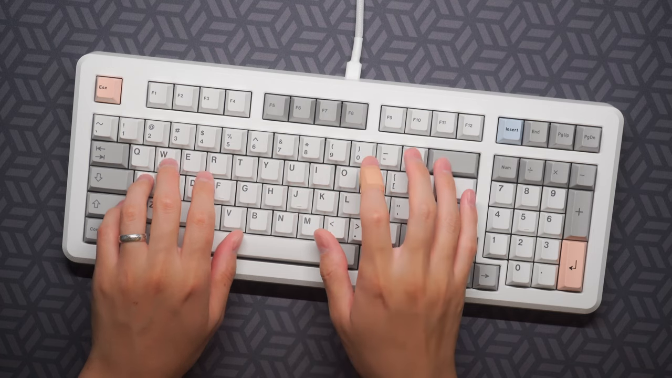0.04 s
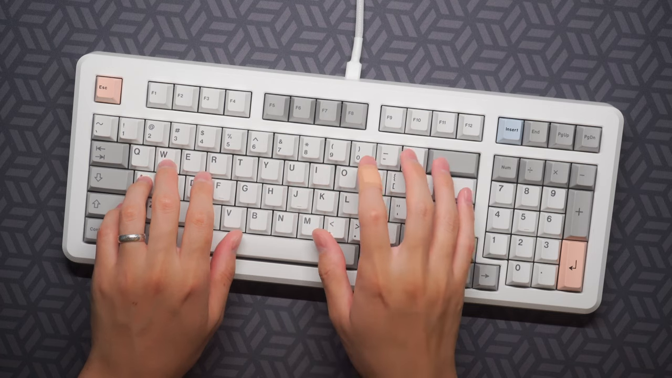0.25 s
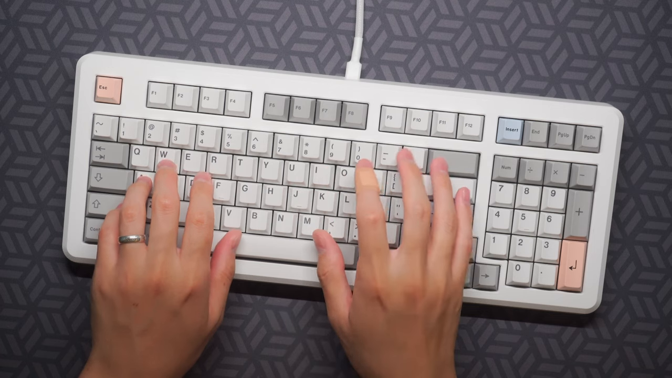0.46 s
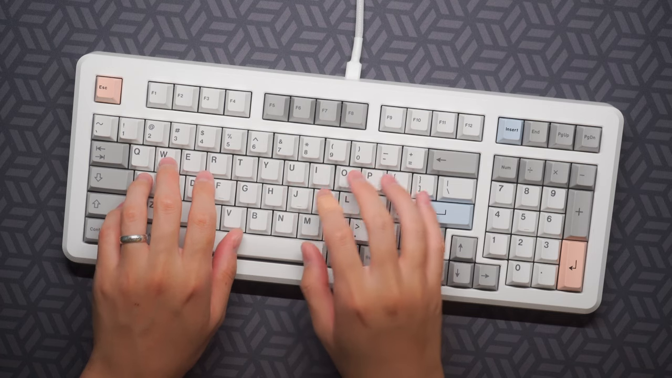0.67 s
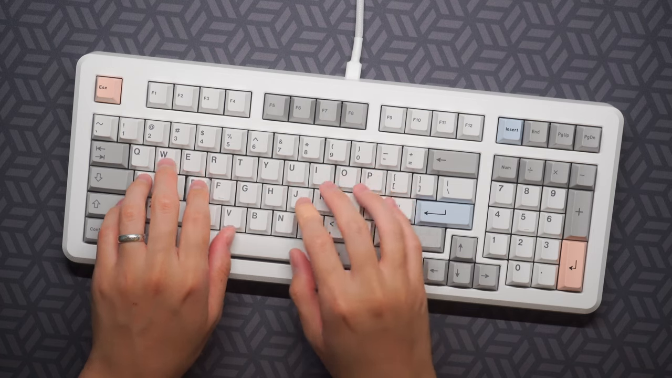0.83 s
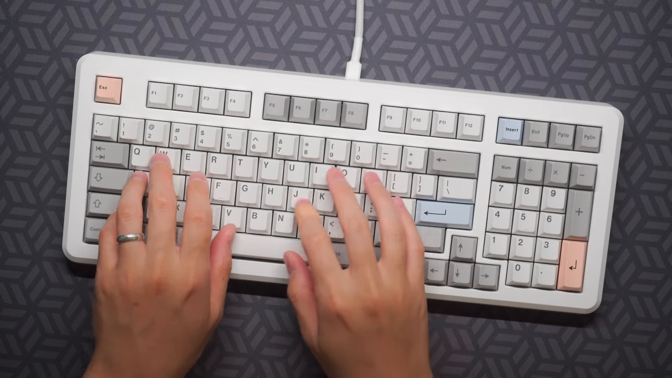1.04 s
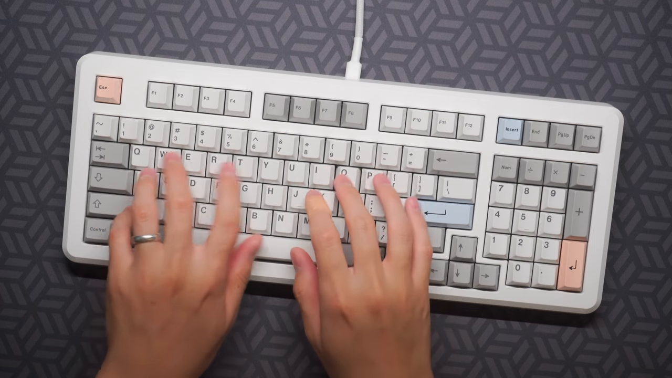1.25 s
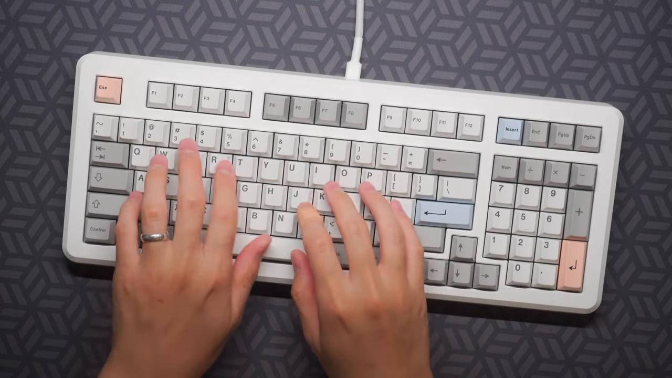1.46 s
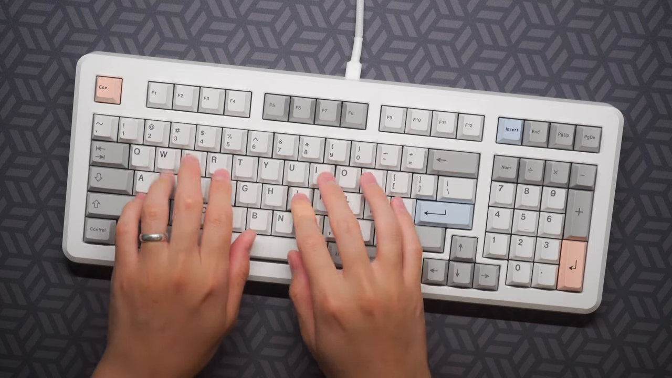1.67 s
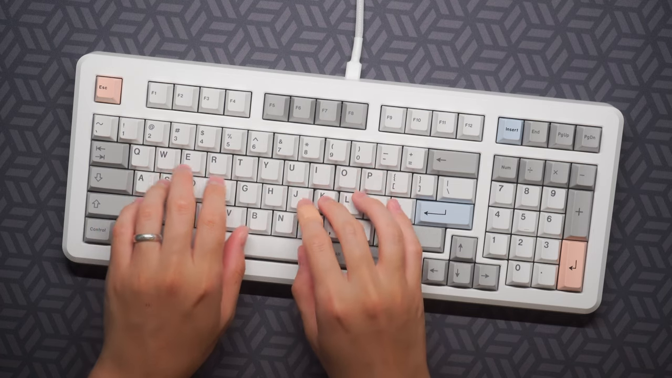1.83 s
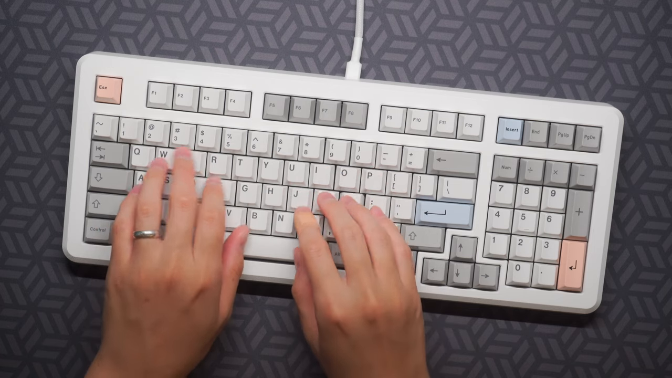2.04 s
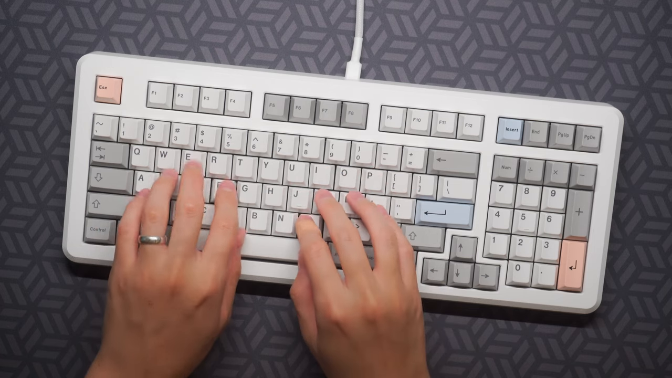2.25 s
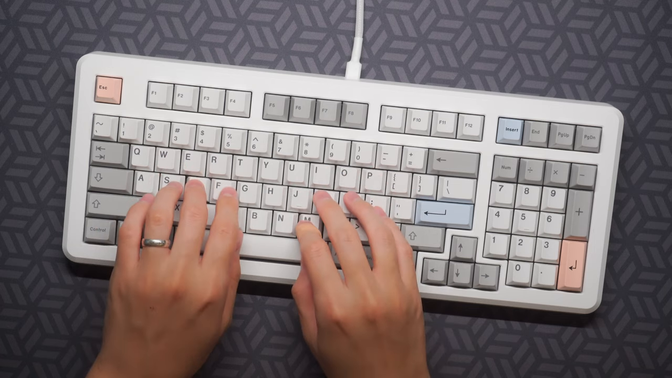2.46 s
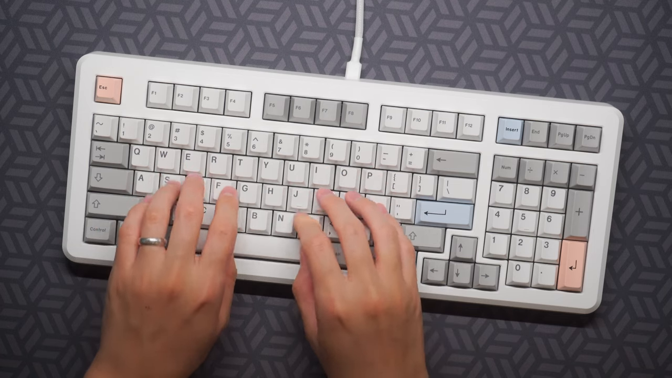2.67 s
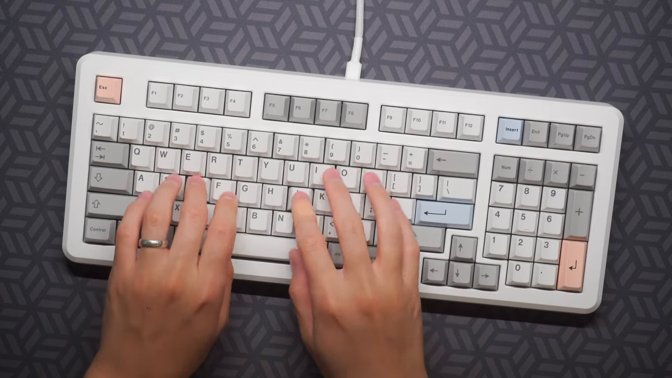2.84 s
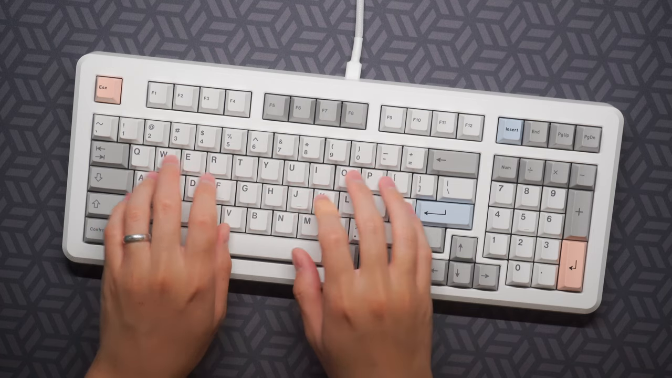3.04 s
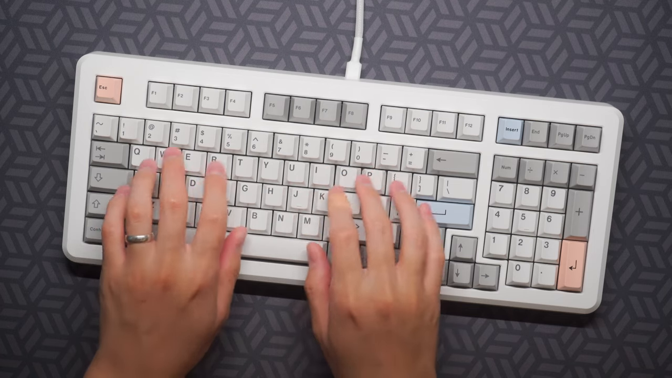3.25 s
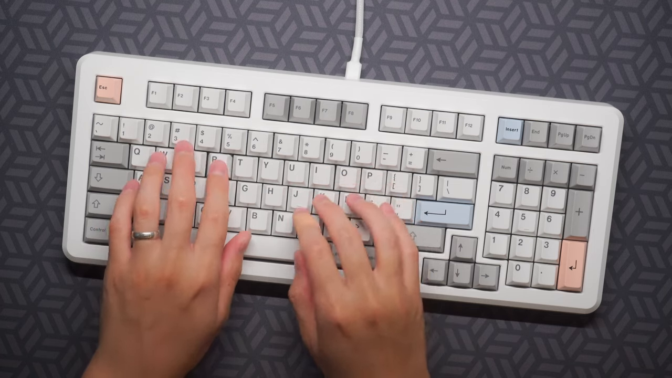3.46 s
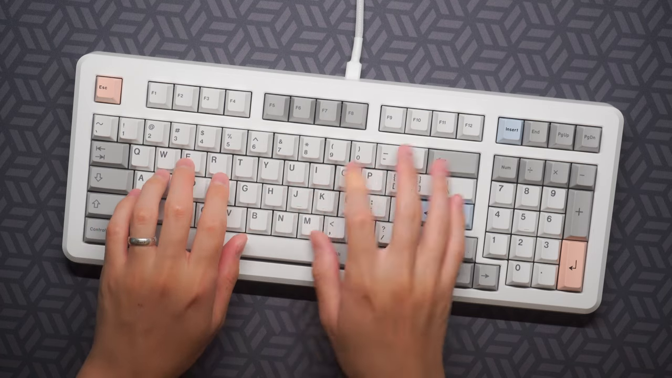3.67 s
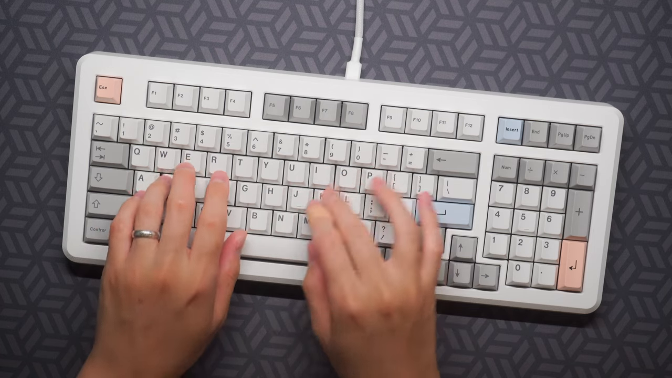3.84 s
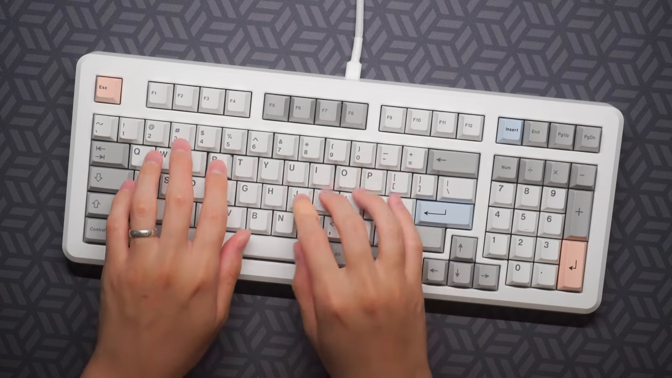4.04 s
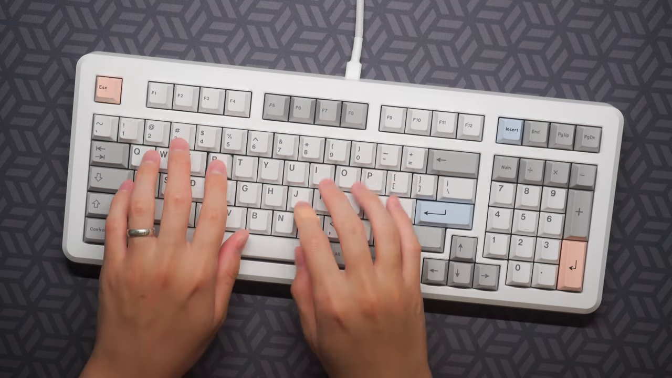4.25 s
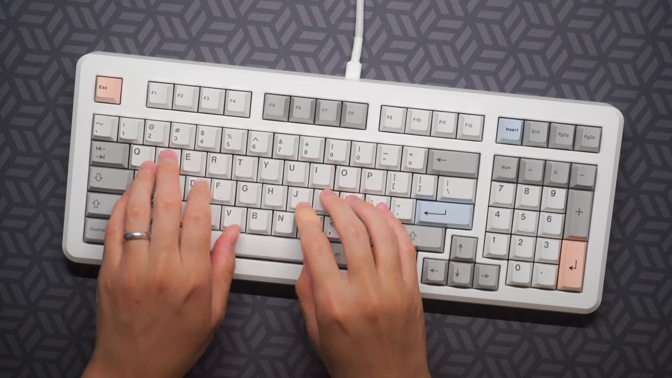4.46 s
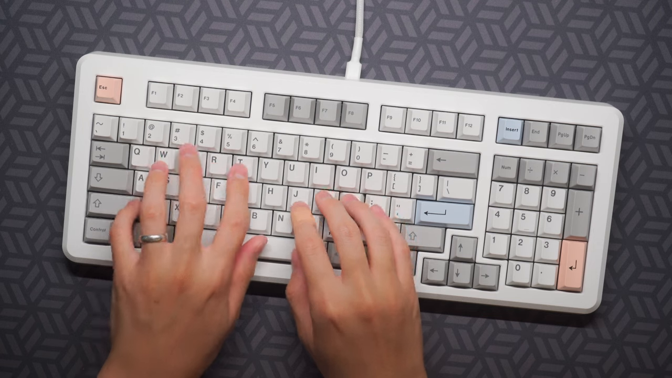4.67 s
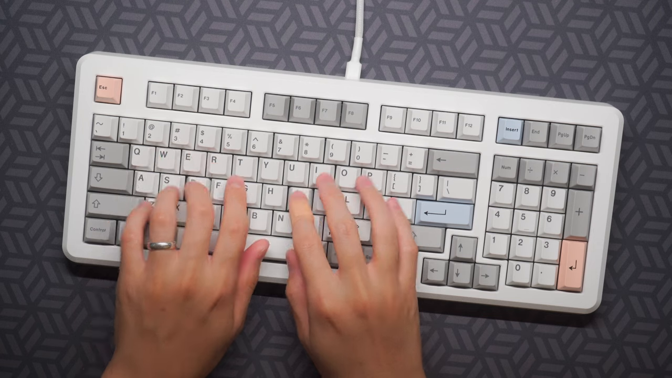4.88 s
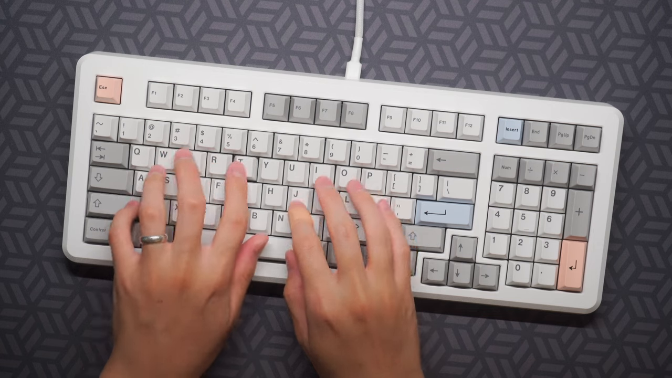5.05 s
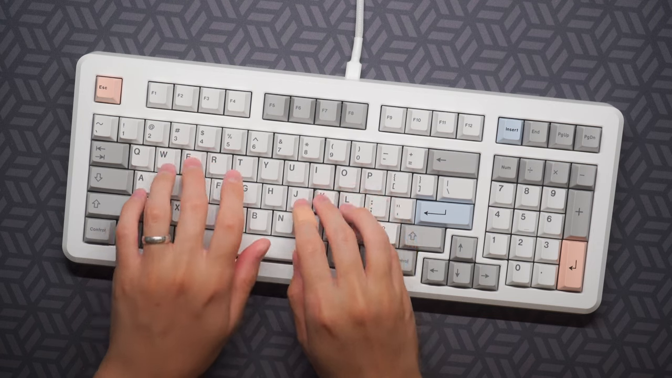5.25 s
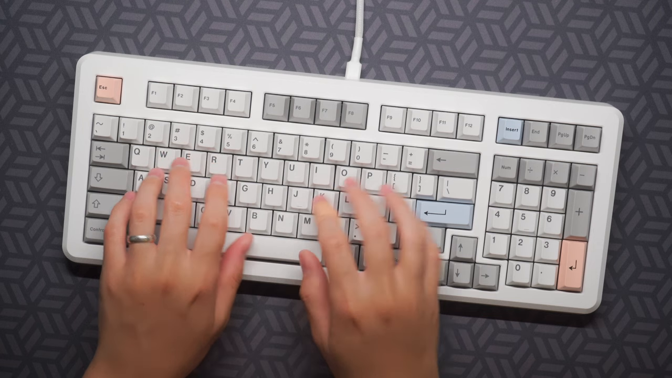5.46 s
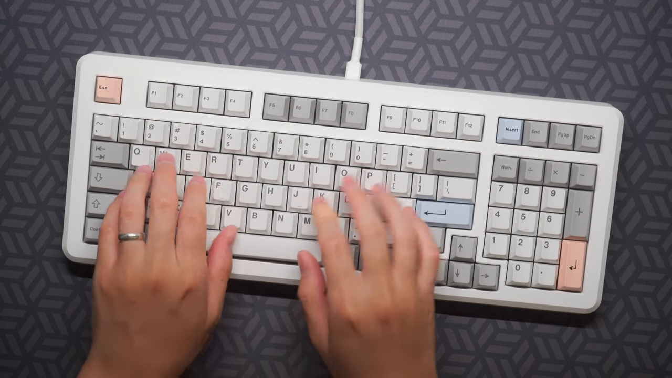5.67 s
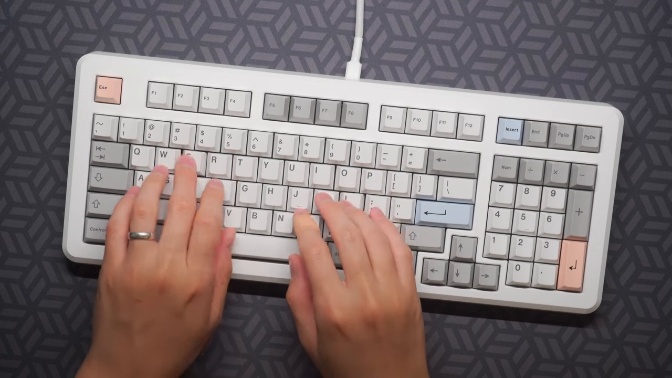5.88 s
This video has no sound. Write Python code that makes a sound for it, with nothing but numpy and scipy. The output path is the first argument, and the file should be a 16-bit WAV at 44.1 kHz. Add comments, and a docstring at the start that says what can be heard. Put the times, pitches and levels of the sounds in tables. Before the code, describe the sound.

Close-up of rapid keyboard typing: low, rounded case thumps, some hard and some light, mixed with dry stem clicks, spring-back ticks, faint scuffs and skin brushes. It starts sparsely, becomes an almost continuous clatter, pauses briefly midway, then resumes with stronger strokes. The room is quiet, with short dull reflections, a soft desk tremor, low building rumble and thin steady hiss.

```python
"""Fast two-handed typing on a heavy, damped mechanical keyboard: dull thumps under a spray of small plastic ticks.
Keys bottoming out thump case and desk through banks of decaying modes; fingertips, stems and returning caps
tick as noise flurries ringing the plastic; skin brushes, stem scuffs and cap wobbles fill the gaps.
The walls add a few dull echoes and a tail, over building rumble, steady hiss and a trembling desk."""
import sys
import numpy as np
from scipy import signal
from scipy.fft import rfft, irfft, next_fast_len
from scipy.io import wavfile

SR = 44100
rng = np.random.default_rng(int(sys.argv[2]) if len(sys.argv) > 2 else 0)


def unload_wav(signal):
    """Save mono or channel-first audio to the path in sys.argv[1] as 16-bit WAV at rate SR, clipped to [-1, 1]."""
    wavfile.write(
        sys.argv[1],
        SR,
        np.round(np.clip(np.atleast_2d(signal).T, -1, 1) * 32767).astype(np.int16),
    )


N = 260617  # length in samples

# Building rumble. Each row: frequency in Hz, relative density in dB per Hz.
RUMBLE_SPECTRUM = [(12, -58), (20, 2), (38, -11), (79, 5.5), (94, -16), (108, -15.5), (167, -8.5),
                   (260, -32), (340, -93), (570, -120)]
# Fan and microphone hiss. Each row: frequency in Hz, relative density in dB per Hz.
HISS_SPECTRUM = [(150, 5), (260, -3.5), (707, -11.5), (825, -7.5), (1760, -20), (4550, -29.5), (10600, -27),
                 (14700, -22), (16000, -52.5)]
# Resting wrists shaking the desk. Each row: time in seconds, RMS level in dB.
DESK_SWAY = [(0.0, -59), (0.44, -48.5), (0.79, -70), (0.84, -53.5), (5.14, -50.5), (5.54, -54.5),
             (5.9, -52)]
# Fingertips gliding over caps. Each row: start in seconds, level in dB before the part trims,
# nominal length in ms.
BRUSHES = [(0.061, -63.5, 20), (.49, -64, 8), (3.547, -60.5, 9.7), (3.704, -59.5, 23)]
# Fingertips meeting caps and caps springing back. Each row: start in seconds, stem click in dB before
# the common trim, then against that click in dB: cap hollow, switch housing.
CAP_CONTACTS = [(0.192, -48.5, -6, -12), (0.2035, -48, -3, -16), (0.3502, -51, -4, -5),
                (0.4171, -44, 0.5, -4.5), (0.842, -44.5, 0.5, 0.5), (0.9391, -51.5, 5, 16.5),
                (1.0018, -40.5, -7, 0), (1.0475, -51, -6, -3), (1.1106, -53.5, 3, 9.5),
                (1.1785, -42, -20, -18), (1.1908, -37.5, 0.5, -4.5), (1.1993, -39, -7, -10),
                (1.2636, -41, -17, -4.5), (1.3024, -47, -8, -13), (1.3436, -35, -1.5, -2),
                (1.3934, -37.5, -15, -22), (1.5308, -45, 6, -4), (1.542, -54.5, 4, 10),
                (1.6275, -47, -3.5, 6.5), (1.6398, -56, 2, 7), (1.7499, -47, 0, 5), (1.7716, -42, 10, 5),
                (1.8666, -30.5, -25, -11), (1.9832, -40.5, 5, 6), (2.043, -37, -16, -5),
                (2.0497, -38.5, 2, -1), (2.0854, -53.5, 9.5, 6), (2.1172, -42.5, 6, 2.5),
                (2.2586, -54, 2, -4), (2.3713, -44, 8.5, 9.5), (2.4556, -48.5, 4, 6), (2.5753, -62, 8, 5),
                (2.591, -45, 0, -3), (2.7872, -51.5, -2, -2), (2.8304, -37.5, -23, -1.5),
                (2.856, -46.5, -11, 6.5), (2.9577, -35.5, -3.5, -8), (3.011, -59, -7, 20),
                (3.0698, -48.5, 1.5, -1), (3.1083, -51.5, 4, 3), (3.1736, -53, 6.5, 0), (3.2544, -56, 4, 0),
                (3.428, -46, 5, 3.5), (3.7357, -49.5, 0.5, -7), (3.7973, -29.5, 0, 3.5),
                (3.822, -48, 9, -1), (3.8904, -31.5, -3, -6), (3.9493, -29.5, -21, -2),
                (4.0428, -36.5, 0.5, -0.5), (4.0745, -41.5, -0.5, 8.5), (4.1193, -37.5, -29, -10),
                (4.13, -39.5, -13, -2), (4.1386, -45.5, 3, 9), (4.234, -48, 4.5, 0), (4.354, -44, 3, 1),
                (4.4216, -29.5, -33, -1), (4.5239, -44, 8.5, 2.5), (4.5324, -44.5, 6, 0.5),
                (4.58, -43, 1, 1), (4.63, -43.5, -1, 1.5), (4.6677, -47, -10, -20), (4.7171, -39, 1.5, 3),
                (4.76, -38, -33, -18), (4.8218, -41, 2, -2), (4.8326, -44, -1, 2.5), (4.886, -50.5, 4, 6),
                (4.9718, -53.5, 2.5, 2.5), (4.9891, -45, -5, -9), (5.0353, -52, -8, -7),
                (5.0607, -39.5, -1.5, -3.5), (5.1215, -44, -23, -26), (5.136, -34, -10, -7.5),
                (5.2135, -31.5, -3, 0), (5.2962, -40, 1, -1.5), (5.3184, -54, 3, -1),
                (5.5465, -38, -12, -2), (5.6548, -42, -15, -22), (5.725, -50, 7, 5.5),
                (5.8081, -34.5, 3.5, -7), (5.8606, -56.5, 5, -1), (5.899, -42, 4.5, -2.5)]
# Keys landing. Each row: time the stem meets its housing in seconds, peak thump of the lower case in dB,
# then against that thump in dB: upper case, plate, cap hollow and stem click (the last two before trims).
KEY_LANDINGS = [(0.253, -37.5, -6, -9, -6, -10), (0.361, -39, -1, -3, -20, -16),
                (0.414, -35, -2, -20, -4.5, -28), (0.528, -38, -3, -15, -12, -11.5),
                (0.869, -30.5, 1.5, -19, -8, -10), (0.958, -28.5, -8.5, -4, -25, -33),
                (0.993, -40.5, -3, 7, -8, -10), (1.088, -37.5, -9, 1.5, -25, -10),
                (1.134, -33, 4, 6, -15, -15.5), (1.215, -33, -4, -4, -22, -19),
                (1.272, -43.5, 3, 0, -4, -14), (1.362, -24, -9.5, -32, -23, -19),
                (1.411, -34, -1.5, -16, -5.5, -6.5), (1.462, -37, -5, 4.5, -12, -13),
                (1.556, -29, -3, -18, -20, -22), (1.656, -30.5, -6, -18, -16, -12),
                (1.679, -33.5, -4, -1, -8.5, -14), (1.762, -40, 8.5, -15, -17, -9),
                (1.842, -28.5, -19, -19, -17, -16), (1.881, -39.5, 6, -4, -7, -3),
                (1.907, -35.5, -10, 6, -4, 0), (2.009, -38.5, -6, 5.5, -19, -8.5),
                (2.077, -27.5, -13, -2, -16, -16), (2.147, -32.5, 3, -5, -17, -16),
                (2.196, -34, -7, 6, -1, -6), (2.235, -30, -41, -17, -18, -15.5),
                (2.27, -36, 2.5, 1, -2.5, -3.5), (2.303, -27.5, -4, -13, -23, -28),
                (2.393, -31, -1, -12, -10.5, -15), (2.493, -33.5, -32, -13, -15, -16),
                (2.555, -44.5, 3, 2.5, -9, -17), (2.611, -34, -1, -5, -12, -13.5),
                (2.682, -38.5, -1, 6, -1.5, -0.5), (2.723, -36, 3.5, -0.5, -2.5, -7.5),
                (2.82, -32, -4, -20, -6.5, -10), (2.876, -29.5, -20, -11, -17, -20),
                (2.982, -33, -1.5, -19, -9, -4), (3.021, -38, -13, 1.5, -12, -15),
                (3.081, -39.5, 7.5, 0, -0.5, -2), (3.126, -36, 6, 4, -15, -20),
                (3.214, -36, -20, 3.5, -13, -19), (3.242, -36.5, 1.5, 4, -5.5, -8),
                (3.321, -39.5, -6, 1.5, -12, -18), (3.458, -35.5, -9, -3.5, -11.5, -14),
                (3.814, -36, 4, 9, -0.5, -3.5), (3.914, -29.5, -18, -0.5, -19, -18),
                (3.932, -40, 8, -2, -4, -1), (3.99, -35.5, -9, 0, -10, -8),
                (4.06, -29, -4, -17, -12.5, -16), (4.144, -39.5, -6.5, -4, -21, -24),
                (4.167, -25.5, -16, -2, -11.5, -13.5), (4.263, -29.5, -3.5, -11, -15, -16.5),
                (4.317, -36, -21, -9, -18, -15), (4.386, -27, -13, -6, -10.5, -13),
                (4.459, -36, -28, 6, -7, -2), (4.542, -30.5, 0.5, -7, -11, -15),
                (4.61, -30, -17, -7, -17, -15), (4.65, -32, 2, 0.5, -5.5, -8.5),
                (4.737, -28.5, -21, -32, -34, -16), (4.778, -34.5, -7, -25, -16, -2),
                (4.839, -43, 3.5, -11, -5, -5), (4.867, -32.5, 0.5, 0.5, -18, -19),
                (4.927, -28, -4.5, -2.5, -13.5, -16), (5.087, -25, -2, -1.5, -26, -20),
                (5.151, -34.5, -13, -16, -27, -30), (5.174, -28.5, 0.5, -14, -13, -16),
                (5.247, -30.5, -17, -8, -20, -18), (5.31, -36.5, 1.5, -3, -4.5, -7),
                (5.336, -27, -16, -11, -13.5, -20), (5.401, -39, -13, -2.5, -8, -7.5),
                (5.455, -31.5, -14, 1.5, -12.5, -12), (5.564, -27.5, -7.5, -13, -34, -13),
                (5.672, -34.5, 1, 0, -27, -12.5), (5.747, -31.5, 1, -26, -10, -16.5),
                (5.832, -31, -4.5, -0.5, -28, -20)]
# Resonances of the plastic, one list each for cap hollow, stem and switch housing.
# Each row: frequency in Hz, relative level in dB, t60 in seconds.
PLASTIC_MODES = [
    [(1307, 2.5, 0.0048), (1690, -4, 0.013), (1960, -3, 0.012), (2315, -9.5, 0.021)],
    [(2775, -1, 0.0034), (3502, -1, 0.009), (3680, 2, 0.003), (4503, -4, 0.0057), (5040, -4, 0.0035)],
    [(5900, -8.5, 0.0015), (7350, 2, 0.0023), (8550, -1, 0.0057), (9880, 1.5, 0.0018), (11130, -2, 0.0012),
     (13600, -12.5, 0.0038), (15700, -11, 0.0039)],
]
# Resonances of the body, one list each for desk, lower case, upper case and plate.
# Each row: frequency in Hz, relative level in dB, t60 in seconds.
CASE_MODES = [
    [(50.8, -21, 0.39), (75, 11.5, 0.09)],
    [(226.8, -19.5, 0.34), (278, -49, 0.037), (333.8, -7, 0.14), (336, 6.5, 0.033), (399.7, 3.5, 0.048)],
    [(450, -28, 0.04), (460, -8, 0.051), (450, -31, 0.047), (507, -9.5, 0.075)],
    [(639, -7.5, 0.047), (768, 10.5, 0.013), (892, -6.5, 0.0057), (1026, 8, 0.018), (1180, -6.5, 0.004)],
]
# Nearest walls. Each row: delay in seconds, echo level in dB before dulling.
WALL_ECHOES = [(0.0139, -21.5), (0.0192, -18.5), (.0335, -28)]

RUMBLE_DB, HISS_DB = -54.5, -63.5  # RMS
SWAY_HZ, SWAY_WIDTH_HZ = 46.2, 4.2
CLICK_MS, RATTLE_MS = 3.3, 3.54  # nominal flurry lengths; CLICK_MS holds at -45 dB
LOUD_SHORTENS_PER_DB = 0.06  # a harder click is over sooner
LENGTH_SPREAD = 0.3  # log spread of click and rattle lengths
SINK_S = 0.001966  # the case gives way this long after the stem meets its housing
CASE_SCATTER_DB, SCUFF_SCATTER_DB = 5, 3.5
TOP_HZ = 16000


def undb(db):
    """Turn decibels into an amplitude factor."""
    return 10 ** (np.asarray(db) / 20)


def steady(spectrum, level_db):
    """Shape white noise to a spectrum, interpolated over log frequency, at a fixed RMS level."""
    size = next_fast_len(N)
    hz = np.maximum(np.arange(size // 2 + 1) * SR / size, 1)
    table_hz, table_db = np.transpose(spectrum)
    shape = undb(np.interp(np.log(hz), np.log(table_hz), table_db))
    noise = irfft(rfft(rng.standard_normal(size)) * shape, size)[:N]
    return noise * undb(level_db) / np.sqrt(np.mean(noise ** 2))


def sway():
    """The desk's lowest mode, kept trembling by the hands: narrow-band noise with a drawn level."""
    peak = signal.iirpeak(SWAY_HZ, SWAY_HZ / SWAY_WIDTH_HZ, fs=SR)
    tremble = signal.lfilter(*peak, rng.standard_normal(N))
    level_db = np.interp(np.arange(N) / SR, *np.transpose(DESK_SWAY))
    return tremble / np.std(tremble) * undb(level_db)


def ring(modes, count, scatter_db, detune, size, flip):
    """One bank of decaying sines per blow, each blow with its own mode balance and tuning."""
    hz, db, t60 = np.transpose(modes)[:, None, :, None]
    chance = rng.standard_normal((count, 2, hz.size, 1))
    blow_hz = hz * (1 + detune * chance[:, 0])
    blow_gain = undb(db + scatter_db * chance[:, 1])
    sign = flip ** np.arange(hz.size)[:, None]  # flip -1 opposes neighbouring modes
    t = np.arange(size) / SR
    swing = np.sin(2 * np.pi * blow_hz * t) * np.exp(-np.log(1000) * t / t60)
    return np.sum(sign * blow_gain * swing, axis=1)


def strike(times, pushes, parts, part_db, scatter_db, detune, size, flip=-1):
    """Each push excites the modes of every part, scaled to that part's peak level."""
    out = np.zeros(N + SR)
    for modes, db in zip(parts, part_db):
        responses = ring(modes, len(times), scatter_db, detune, size, flip)
        sounds = signal.fftconvolve(pushes, responses, axes=1)
        gains = undb(db) / np.abs(sounds).max(axis=1)
        for s, sound, gain in zip(times, sounds, gains):
            i = int(s * SR)
            out[i:i + len(sound)] += gain * sound
    return out[:N]


def ticks(starts, part_db, ms, spread=0.48, swell=0.8, level_db=4.0):
    """A short flurry of tiny impacts swells and dies, ringing cap hollow, stem and housing."""
    shape = (len(starts), 2048)
    grit = rng.standard_normal(shape) * rng.exponential(size=shape)
    decay_s = spread * np.maximum(ms, 0.5)[:, None] / 1000
    t = np.arange(2048) / SR / decay_s
    flurry = grit * t ** swell * np.exp(-t)
    return strike(starts, flurry, PLASTIC_MODES, level_db + np.array(part_db), 2.53, 0.022, size=512)


def brushes(cap_db=-14, housing_db=3):
    """Skin drags over the textured caps, thin and airy, with little cap hollow."""
    s, db, ms = np.transpose(BRUSHES)
    return ticks(s, [db + cap_db, db, db + housing_db], ms, level_db=0.5)


def clicks():
    """Fingertips and returning caps tick, each with its own share of hollow, stem and housing."""
    s, db, hollow, housing = np.transpose(CAP_CONTACTS)
    loudest = db + np.maximum(housing, 0)
    uneven = LENGTH_SPREAD * rng.standard_normal(len(s))
    ms = CLICK_MS * np.exp(uneven - LOUD_SHORTENS_PER_DB * (loudest + 45))
    return ticks(s, [db + hollow, db, db + housing], ms, level_db=1.5)


def slides(travel_s=0.022, cap_db=-30, stem_db=-30, housing_db=-24):
    """The stem scuffs in its guide: noise growing steadily until the stem meets its housing."""
    s, db = np.array(KEY_LANDINGS)[:, :2].T
    t = np.arange(2048) / SR / travel_s
    scuff = rng.standard_normal((len(s), 2048)) * t * (t < 1)
    scatter = SCUFF_SCATTER_DB * rng.standard_normal((len(s), 3)).T
    part_db = db + scatter + [[cap_db], [stem_db], [housing_db]]
    return strike(s - travel_s, scuff, PLASTIC_MODES, part_db, 1.4, 0.022, size=512)


def rattles(lean_db=2.5, housing_db=-0.5):
    """The stem meets the bottom of its housing; stem and housing share the click unevenly."""
    s, db, *_, hollow, click = np.transpose(KEY_LANDINGS)
    lean, uneven = rng.standard_normal((len(s), 2)).T
    stem = db + click + lean_db * lean
    housing = db + click + housing_db - lean_db * lean
    ms = RATTLE_MS * np.exp(LENGTH_SPREAD * uneven)
    return ticks(s, [db + hollow, stem, housing], ms, level_db=1)


def thumps(contact_s=0.0015, desk_db=-16, return_db=-6, return_plate_db=-3):
    """The case is pressed into the mat and springs back, ringing desk, case and plate."""
    s, db, upper, plate, *_ = np.transpose(KEY_LANDINGS)
    back_s, click, hollow, _ = np.transpose(CAP_CONTACTS)
    landing = db + np.array([desk_db + 0 * db, 0 * db, upper, plate])
    # a cap that hits its stop knocks the case lightly, as hard as its hollow sounds
    back = click + hollow + np.array([[return_db + desk_db], [return_db], [return_db], [return_plate_db]])
    # one full sine cycle: down, then back up
    push = -np.sin(2 * np.pi * np.clip(np.arange(128) / SR / contact_s, 0, 1))
    times = np.append(s + SINK_S, back_s)
    part_db = np.hstack([landing, back])
    return strike(times, push[None], CASE_MODES, part_db, CASE_SCATTER_DB, 0.0054, size=8192, flip=1)


def wobbles(after_s=0.13, under_db=-31, scatter_db=2.5, ms=2.0):
    """Loose caps wobble faintly twice, at random moments within after_s of each landing."""
    s, db = np.repeat(np.array(KEY_LANDINGS)[:, :2], 2, axis=0).T
    part_db = db + under_db + scatter_db * rng.standard_normal((len(s), 3)).T
    return ticks(s + after_s * rng.random(len(s)), part_db, ms + 0 * s)


def walls(x, t60_s, tail_db, dull_hz):
    """A few discrete echoes and a diffuse noise tail, duller than the direct sound."""
    t = np.arange(int(0.4 * SR)) / SR
    fade_in = np.clip(t / 0.005, 0, 1)
    tail = rng.standard_normal(len(t)) * np.exp(-np.log(1000) * t / t60_s) * fade_in
    tail *= undb(tail_db) / np.sqrt(np.sum(tail ** 2))
    # the underside of the case swings opposite to the top, so echoes come inverted
    for s, db in WALL_ECHOES:
        tail[int(s * SR)] -= undb(db)
    echoed = signal.fftconvolve(x, tail)[:N]
    return signal.lfilter(*signal.butter(1, dull_hz, fs=SR), echoed)


def scene():
    """Sum the keyboard, its reflections and the steady background."""
    background = steady(RUMBLE_SPECTRUM, RUMBLE_DB) + steady(HISS_SPECTRUM, HISS_DB) + sway()
    plastic = brushes() + clicks() + slides() + rattles() + wobbles()
    case = thumps()
    # case and ticks each get their own echoes and tail; the ticks' tail is a little louder and brighter
    space = walls(case, t60_s=0.27, tail_db=-10, dull_hz=1340)
    space += walls(plastic, t60_s=0.21, tail_db=-9.0, dull_hz=2640)
    return (case + plastic + space + background)[None]


def record(dry):
    """A steep elliptic low-pass cuts the top above TOP_HZ."""
    return signal.sosfilt(signal.ellip(10, 0.2, 60, TOP_HZ, fs=SR, output="sos"), dry)


dry = scene()
out = record(dry)
unload_wav(out)
```